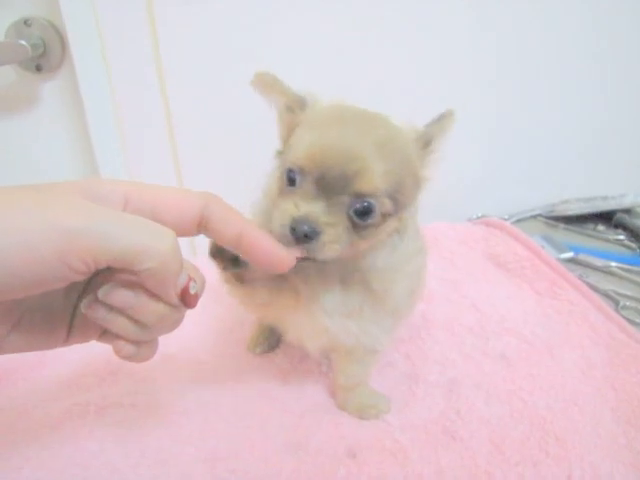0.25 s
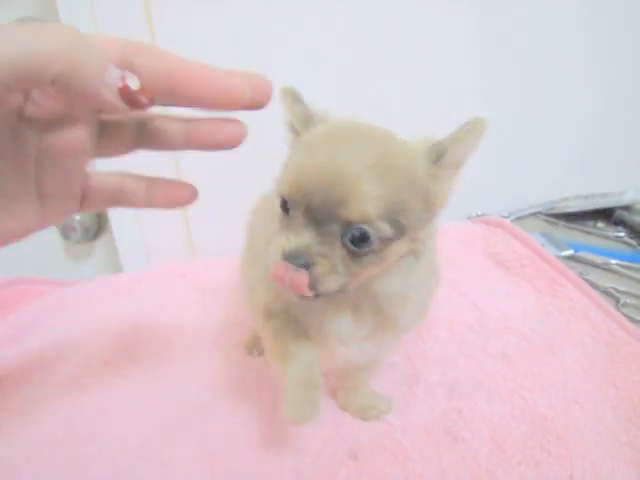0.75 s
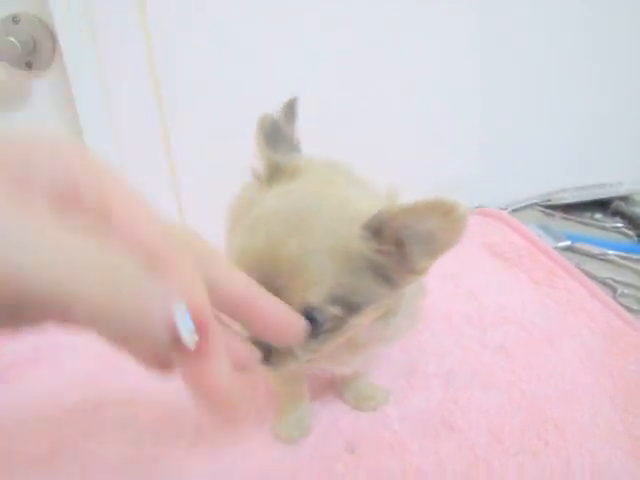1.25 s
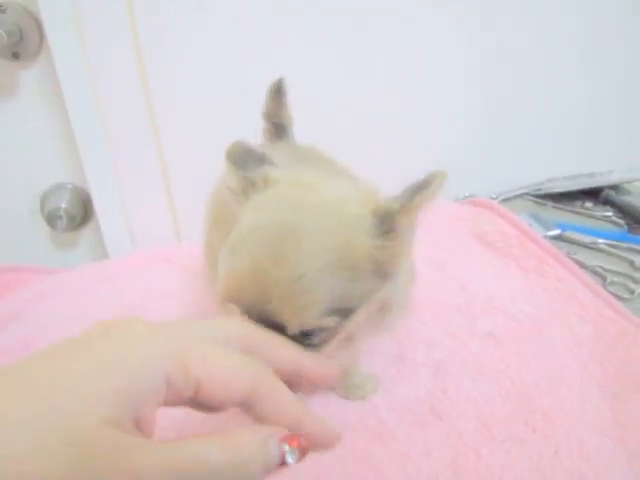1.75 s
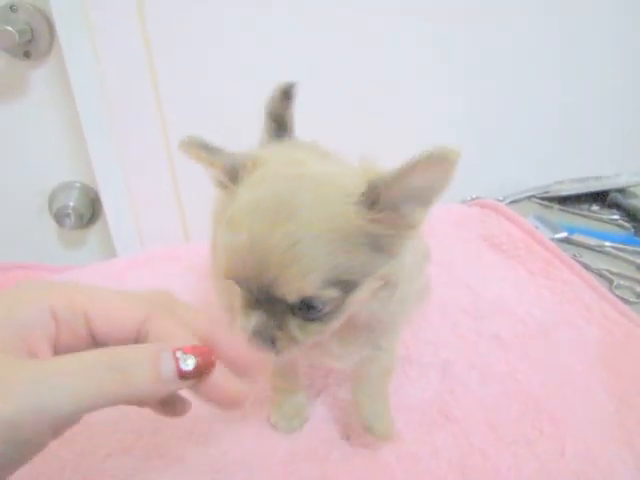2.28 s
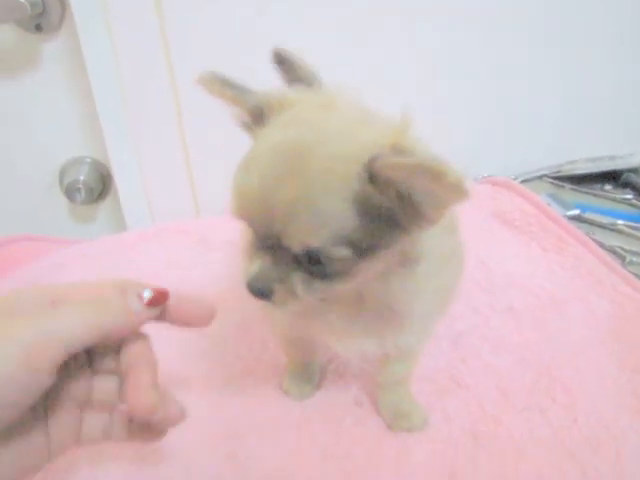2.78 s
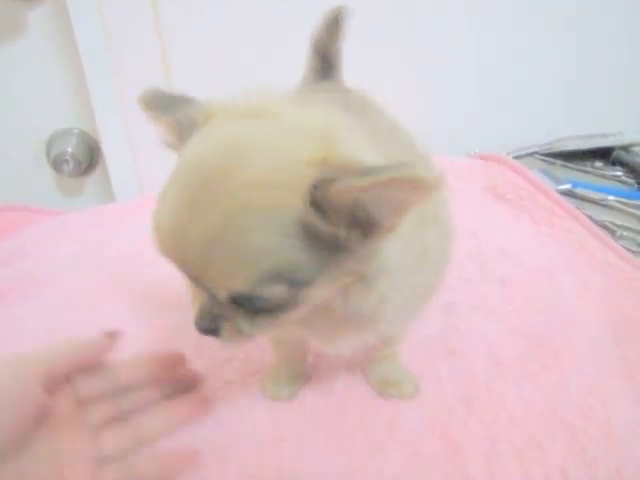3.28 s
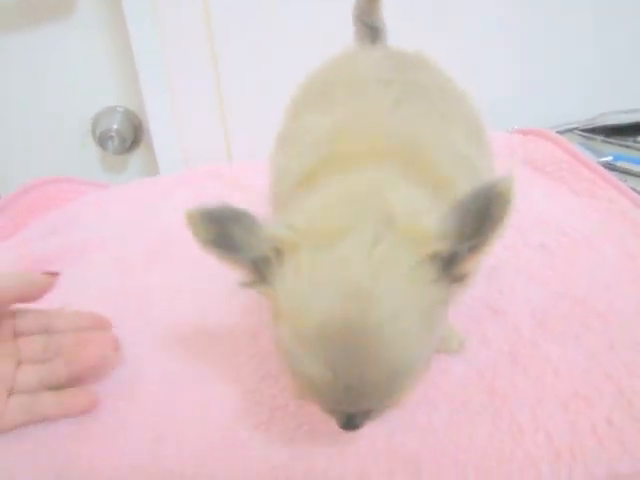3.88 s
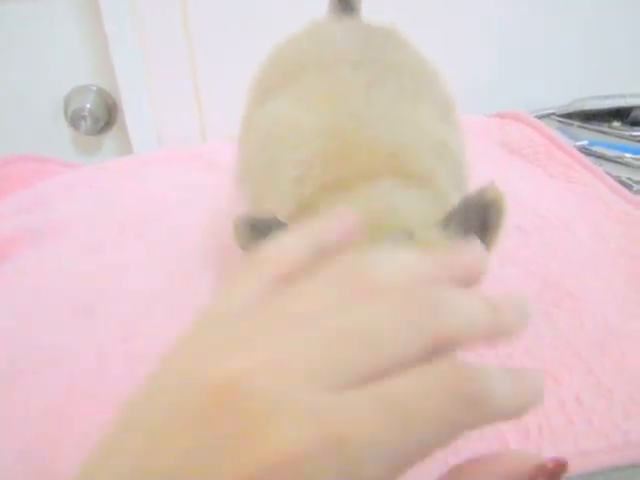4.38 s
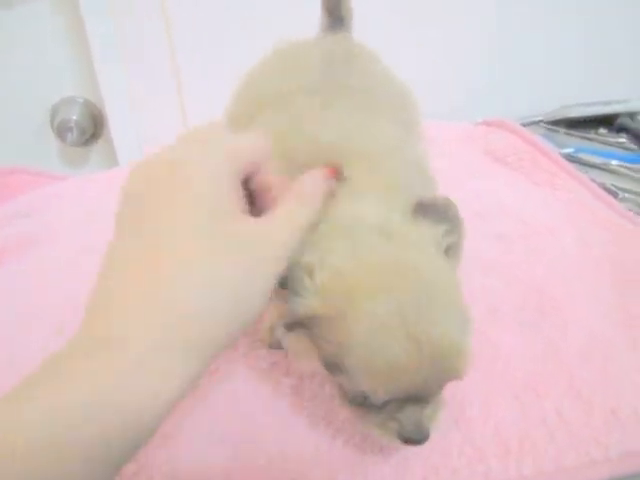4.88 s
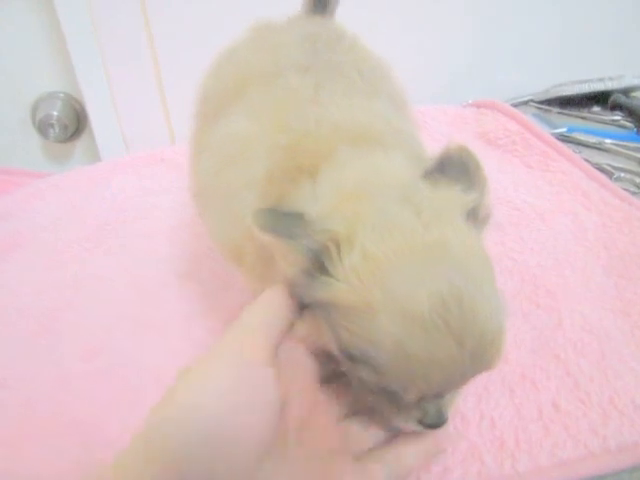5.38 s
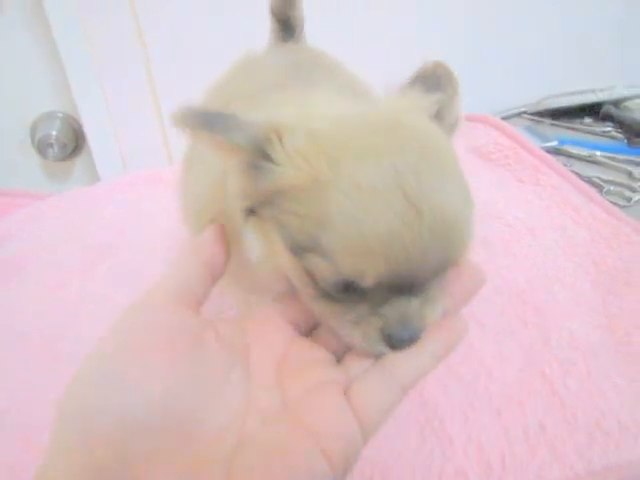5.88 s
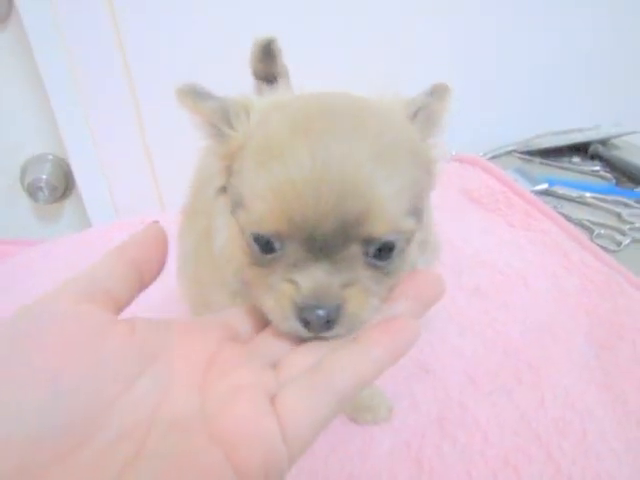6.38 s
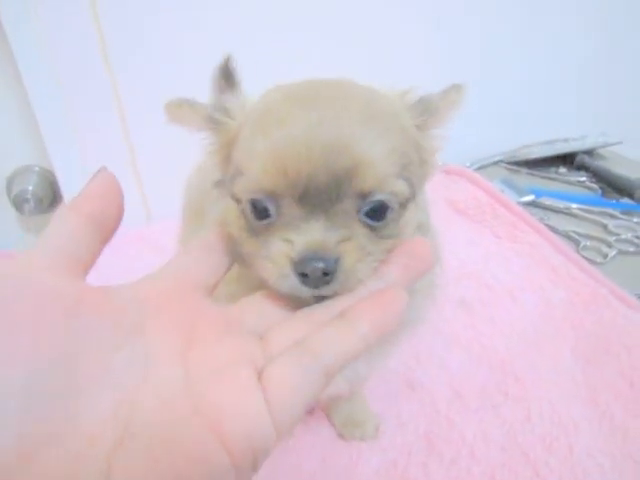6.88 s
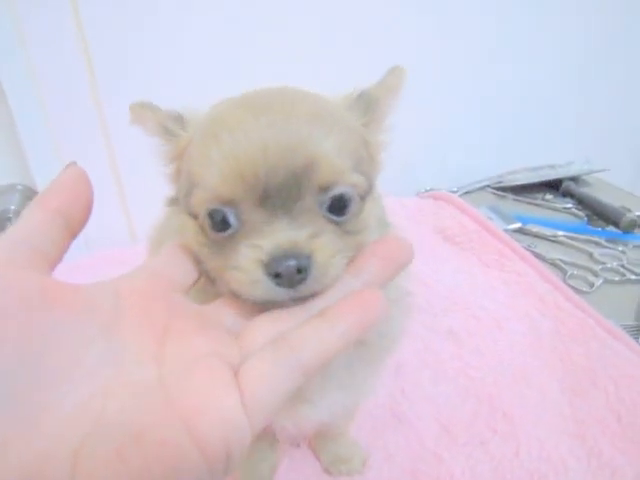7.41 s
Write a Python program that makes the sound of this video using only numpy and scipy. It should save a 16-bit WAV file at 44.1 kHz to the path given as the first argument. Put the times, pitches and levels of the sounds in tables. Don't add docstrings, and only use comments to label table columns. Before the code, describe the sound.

Close stereo pickup of hissy nose puffs, small clicks and fur brushing over soft room air and low fan hum. A nearby puppy gives a soft low moan; distant yaps echo sharply halfway through, the second loudest. A thin plaintive howl follows, holds, slides down and is briefly answered by another puppy, with whimpers and nasal whistling, before only ticks, soft strokes and very faint yaps remain.

```python
import sys
import numpy as np
from scipy import signal
from scipy.fft import rfft, irfft
from scipy.io import wavfile
from scipy.ndimage import uniform_filter1d

SR = 44100
rng = np.random.default_rng(int(sys.argv[2]) if len(sys.argv) > 2 else 0)


def generate_wav(sig):
    pcm = np.round(np.clip(np.atleast_2d(sig).T, -1, 1) * 32767).astype(np.int16)
    wavfile.write(sys.argv[1], SR, pcm)


def volts_from_decibels(level):
    exponent = np.asarray(level, float) / 20
    return 10 ** exponent


N = 337365


def evened(x):
    return x / np.sqrt(np.mean(x ** 2) + 1e-20)


def read(points, hz):
    f, value = np.transpose(points)
    return np.interp(np.log(hz + 1), np.log(f + 1), value)


def add(mix, s, sound):
    part = mix[..., round(s * SR):round(s * SR) + sound.shape[-1]]
    part += sound[..., :part.shape[-1]]


def coloured(points, channels):
    white = rfft(rng.standard_normal((channels, N)))
    return irfft(white * volts_from_decibels(read(points, np.fft.rfftfreq(N, 1 / SR))), N)


def drift(size, hz):
    a, b = rng.standard_normal((2, size + SR))
    r = np.exp(-np.pi * hz / SR)
    once = signal.lfilter([1], [1, -r], a + 1j * b)
    twice = signal.lfilter([1], [1, -r], once)[SR:]
    return twice / np.sqrt(np.mean(abs(twice) ** 2))


def stereo(mid, side):
    return np.array([mid + side, mid - side])


def sniffs():
    # t/s at the middle, hiss level/dB
    quick = [(.426, -63), (.482, -62), (.624, -54.5), (.716, -53), (.829, -55), (.913, -51.5),
             (1.004, -55.5), (1.065, -51), (1.183, -56), (1.244, -54.5), (1.298, -62), (1.442, -62)]
    faint = [(1.911, -63), (2.047, -63), (2.104, -62.5), (2.167, -65), (2.287, -63), (2.45, -63.5),
             (2.57, -66), (2.663, -64), (2.772, -63), (2.894, -57.5), (2.986, -59)]
    deep = [(3.105, -54), (3.199, -57), (3.373, -59.5), (3.475, -53), (3.546, -58), (3.782, -49),
            (3.871, -53.5), (3.975, -55), (4.07, -58.5), (4.982, -57.5)]
    # length/s, low rush against hiss/dB
    bouts = [
        (0.015, -7),
        (.024, 1.5),
        (.03, 1.5),
    ]
    # t/s at the middle, length/s, hiss level/dB, low rush level/dB
    rubs = [
        (1.86, .012, -84, -58),
        (3.3, 0.05, -53.5, -49),
        (4.814, 0.37, -61, -59.5),
        (5.336, 0.064, -90, -49.5),
        (6.11, 0.015, -62, -58),
        (6.516, 0.096, -65.5, -63),
        (7.083, 0.013, -58, -68.5),
        (7.385, 0.034, -82, -63),
    ]
    # f/Hz, level/dB
    hiss = [(3000, -6.5), (6000, 2.5), (11000, -1.5), (15500, -8)]
    # f/Hz, level/dB
    rush = [(700, -23.5), (2000, -3), (3500, -2.5), (6000, -11), (9000, -27.5)]
    rows = list(rubs)
    for bout, (length, rush_db) in zip((quick, faint, deep), bouts):
        rows += [(s, length, db, db + rush_db) for s, db in bout]
    t, out = np.arange(0, N, 16) / SR, np.zeros((2, N))
    for column, colour in ((2, hiss), (3, rush)):
        power = np.zeros(len(t))
        for row in rows:
            s, length = row[:2]
            half = length * np.where(t < s, .85, 1.15)
            power += volts_from_decibels(2 * row[column]) * np.exp(-2.8 * ((t - s) / half) ** 2)
        envelope = np.interp(np.arange(N) / SR, t, np.sqrt(power))
        mid, side = evened(coloured(colour, channels=2))
        out += volts_from_decibels(0.5) * envelope * stereo(mid, volts_from_decibels(-5.0) * side)
    return out


def ticks():
    # t/s, peak level/dB, ring f/Hz, left against
    # right/dB
    middle = [(0.4321, -31.5, 2790, -4), (0.4993, -35.5, 2720, -6), (1.094, -33.5, 2900, -5),
              (1.201, -31, 3870, -5), (1.212, -32, 4170, -2.5), (1.591, -38, 4340, -1.5),
              (1.853, -35, 4500, -1.5), (2.304, -44, 3600, -2.5), (2.827, -45, 2660, -1.5),
              (3.1125, -32, 3540, -3), (5.4562, -42, 3470, -6), (6.5862, -43, 4140, 10),
              (7.059, -36.5, 4360, -0.5), (7.085, -33.5, 4230, -0.5), (7.159, -48, 2600, -3)]
    bright = [(0.4823, -40, 7220, -2.5), (0.525, -41.5, 6600, -0.5), (1.2989, -47, 5900, -0.5),
              (1.4401, -41, 7740, -1.0), (2.1275, -37, 5600, 0.0), (2.17, -36, 7800, 3),
              (2.1705, -39, 4050, -2), (3.0736, -40, 5530, 0.0), (6.095, -31, 7420, 8),
              (6.941, -30.5, 12100, -7), (6.941, -26.5, 7800, -4), (6.962, -42, 11000, 0)]
    dull = [
        (0.2614, -36, 1060, -2.0),
        (1.5915, -34, 1950, -5),
        (1.7984, -32, 2380, -4),
        (2.1284, -37, 1400, -4),
        (2.659, -40, 1940, -2.0),
        (6.4895, -36, 955, 1),
        (6.5044, -34, 1540, -10),
        (6.5298, -34.5, 1565, -2.0),
    ]
    ring_cycles = [
        2.56,
        2.2,
        1.56,
    ]
    out, t = np.zeros((2, N)), np.arange(900) / SR
    for kind, cycles in zip((middle, bright, dull), ring_cycles):
        for s, db, hz, pan_db in kind:
            u = 3 * t * hz / max(cycles, .3)
            swell = np.e * u * np.exp(-u)
            scuff = uniform_filter1d(rng.standard_normal(900), 12) * np.exp(-t / 0.0057)
            gain = volts_from_decibels(db - 3.0 + np.array([[.5], [-.5]]) * pan_db)
            add(out, s, gain * (swell + 0.82 * scuff) * np.sin(2 * np.pi * hz * t))
    return out


def puppies():
    # t/s, pitch f/Hz, effort level/dB, mouth opening as second partial over first/dB
    moan = [
        (.33, 150.3, -53, 2.5),
        (.44, 170.6, -49, -5.5),
        (.58, 193, -44.5, -7),
        (.66, 199.1, -34.5, -13.5),
        (.76, 202.6, -43, -1),
        (.87, 191.4, -37.5, -11),
        (1.0, 182.6, -51, -1),
        (1.2, 165.6, -54, -17),
        (1.3, 169, -59, -8),
    ]
    howl = [
        (4.4, 312.4, -42, -8),
        (4.49, 327.7, -35, -4),
        (4.535, 370.4, -30, -5),
        (4.58, 435.5, -38, 3.5),
        (4.77, 447.8, -26, -0.5),
        (4.9, 460.5, -31.5, -1),
        (5.2, 448.7, -30, -2),
        (5.32, 432, -39, 3),
    ]
    sag = [
        (5.3, 441.7, -40.5, 4),
        (5.42, 423.5, -32.5, -2),
        (5.5, 393.4, -34, -0.5),
        (5.66, 370.8, -36, -5.5),
        (5.78, 373, -50, 5),
        (5.9, 376.3, -37.5, -2),
        (6.16, 359.6, -34.5, -2),
        (6.24, 310.5, -32.5, -8),
        (6.3, 295.7, -52, 6),
    ]
    growl = [
        (3.38, 171.4, -55, -8),
        (3.52, 178.6, -46.5, -11),
        (3.6, 282.2, -40.5, -4.5),
        (3.66, 317.6, -38.5, 0),
    ]
    answer = [
        (5.67, 401.4, -30, -3.5),
        (5.725, 496.5, -37, 1.5),
        (5.79, 505.7, -45.5, 17.5),
        (5.87, 475, -39, 6),
        (5.99, 425.3, -51.5, 6),
    ]
    yaps = [
        [(3.59, 525.7, -61, -6.5), (3.62, 698.4, -45.5, 12), (3.64, 747, -41, 16.5), (3.68, 783.7, -35, 15.5),
         (3.72, 833, -36.5, 12), (3.78, 781, -51, 4)],
        [(4.19, 488.3, -54, 14.5), (4.213, 529, -52, 29), (4.232, 571.5, -40.5, 23.5),
         (4.244, 738.7, -22, 14.5), (4.272, 827, -26.5, 18), (4.325, 808.3, -30.5, 0), (4.365, 828.4, -23, 7),
         (4.4, 775, -56, 19)],
        [(7.3, 370, -91, 14), (7.35, 390, -79.5, 24.8), (7.5, 370.6, -74.5, 6)],
        [(7.56, 559, -82, 21.8), (7.622, 567.6, -68, 27.8), (7.66, 564, -55.5, 40.9)],
        [(3.582, 808, -53.5, -17.5), (3.6, 940.4, -34.5, -4.5), (3.7, 879, -31, -17), (3.75, 890, -50, -17)],
    ]
    # f/Hz, level/dB
    wide = [
        [(1800, 8.5), (2400, -23), (2900, -2.5), (3350, -2.5), (3550, -29.5), (4900, -21.5), (5200, -37),
         (8000, -39.5), (11500, -41.5), (15000, -52)],
        [(1000, -1), (2400, -23.5), (3100, -13), (3600, -30), (4100, -14), (4950, -20.5), (5150, -28.5),
         (8500, -56.5), (11500, -46), (15000, -59.5)],
        [(1150, 4), (2000, -14.5), (2800, 0), (3600, -25.5), (5000, -17), (7000, -32)],
        [(1700, -41), (2900, -27), (3500, -76), (9000, -65)],
        [(2800, -15), (5000, -21.5), (6000, -50)],
    ]
    # f/Hz, level/dB
    half_open = [(1500, -10.5), (2000, -23.5), (2600, -44), (4500, -57), (6000, -72)]
    # f/Hz, level/dB
    shut = [(500, -16.5), (950, -24), (1350, -26.5), (1900, -28.5), (2400, -54.5), (5000, -65)]
    yap_rough = [.1, .09, .08, .012, .5]
    # t/s, length/s, level/dB, first pitch f/Hz, last pitch f/Hz
    whimpers = [
        (2.7, .12, -53, 227, 206),
        (4.31, .1, -43, 500, 300),
        (5.985, .08, -43, 212, 198),
        (6.18, .25, -37, 330, 180),
    ]
    whines = [
        (4.97, .09, -57, 325, 330),
        (6.08, .29, -52, 545, 430),
    ]
    far, near = np.zeros((2, N))
    for rows, mouth, rough in zip(yaps, wide, yap_rough):
        add(far, *call(rows, mouth, odd_db=0, flutter_hz=125.0, rough=rough))
    voices = [(moan, .08), (howl, .035), (sag, .08), (growl, .85)]
    voices += [(arch(*row, open_db=-7), .4) for row in whimpers]
    voices += [(arch(*row, open_db=16), .55) for row in whines]
    for rows, rough in voices:
        add(near, *call(rows, shut, odd_db=2.0, flutter_hz=58.8, rough=rough))
    add(near, *call(answer, half_open, odd_db=-4.5, flutter_hz=70., rough=.09))
    add(near, *whistle())
    direct = (volts_from_decibels(1.0) * far + near) * volts_from_decibels(np.array([[-.4], [.4]]))
    return direct + room(volts_from_decibels(-0.5) * far, liveness=0.73) + room(volts_from_decibels(-9) * near, liveness=.55)


def call(rows, mouth, odd_db, flutter_hz, rough):
    # t/s, depth/dB
    level_dips = [
        (.91, -35),
        (4.727, -21),
        (4.854, -12),
        (5.315, -12),
        (5.486, -9),
        (5.572, -10),
        (5.986, -21),
        (6.178, -14),
        (6.225, -4),
    ]
    dip_s, rough_per_db = 0.012, .07
    s, *columns = np.transpose(rows)
    t = np.arange(s[0], s[-1], 1 / SR)
    hz, first_db, open_db = (np.interp(t, s, c) for c in columns)
    first_db = first_db + sum(db * np.exp(-((t - at) / dip_s) ** 2) for at, db in level_dips)
    second_db = first_db + open_db
    effort_db = np.maximum(first_db, second_db)
    rough = np.minimum(rough * (1.5 + rough_per_db * (effort_db.max() - effort_db)), 1)
    turns = np.cumsum(hz * (1 + 0.0498 * rough * drift(len(t), 38.5).real)) / SR
    partials = []
    for k in range(1, int(15000 / hz.max())):
        db = first_db if k == 1 else second_db + (k > 2) * odd_db * (k % 2)
        blur = np.clip(rough * k ** 1.3, 0, 1)
        flutter = np.sqrt(1 - blur ** 2) + blur * drift(len(t), flutter_hz * min(k, 6))
        flutter = flutter * (1 + .25 * drift(len(t), 16.))
        partials.append(np.sqrt(2) * volts_from_decibels(db) * (flutter * np.exp(2j * np.pi * k * turns)).real)
    fade = signal.windows.tukey(len(t), .1)
    upper = rfft(sum(partials[2:]) * fade)
    upper = irfft(upper * volts_from_decibels(read(mouth, np.fft.rfftfreq(len(t), 1 / SR))), len(t))
    return s[0], (partials[0] + partials[1] + upper) * fade


def arch(start, length, db, first_hz, last_hz, open_db):
    return [(start + u * length, first_hz + u * (last_hz - first_hz), db + drop_db, open_db)
            for u, drop_db in ((0, -15), (0.37, 0), (1, -12.5))]


def whistle():
    # t/s, level/dB, centre f/Hz
    path = [
        (5.38, -72, 4200),
        (5.62, -62.5, 4350),
        (5.77, -72, 4340),
        (5.899, -64, 4460),
        (6.12, -66, 4567),
        (6.299, -87, 4610),
    ]
    s, db, hz = np.transpose(path)
    t = np.arange(s[0], s[-1], 1 / SR)
    turns = np.cumsum(np.interp(t, s, hz)) / SR
    band = (drift(len(t), 550.0) * np.exp(2j * np.pi * turns)).real
    return s[0], np.sqrt(2) * volts_from_decibels(np.interp(t, s, db)) * band * signal.windows.tukey(len(t), .2)


def room(x, liveness):
    # f/Hz, t60/s
    decay = [(200, 1), (1000, 1), (1600, 1), (3500, 0.87), (8000, 0.29)]
    # f/Hz, side against mid/dB
    tail_width = [(200, -18), (800, -11), (1600, -8.5), (3000, -1), (6000, 3)]
    hz, t, z = signal.stft(rng.standard_normal((2, int(1.3 * SR))), SR, nperseg=256)
    build_up = np.minimum(t / 0.0077, 1)
    z = z * volts_from_decibels(-60 * t / (liveness * read(decay, hz)[:, None])) * build_up
    z[1] *= volts_from_decibels(read(tail_width, hz))[:, None]
    tail = signal.istft(z, SR, nperseg=256)[1]
    tail = tail / np.linalg.norm(tail[0])
    return stereo(*signal.fftconvolve(x[None], tail, axes=1)[:, :N])


def air():
    # f/Hz, level/dB
    air_colour = [(8.8, -34.5), (15, 2.5), (97, -5.5), (164, -13), (213, -9), (340, -11.5), (394, -17.5),
                  (497, -21), (628, -18), (840, -20.5), (1300, -21.5), (1690, -26), (6670, -35.5),
                  (11000, -40), (16000, -49.5)]
    # f/Hz, side against mid/dB
    air_width = [(60, -7), (110, -5), (200, -9), (380, -7), (700, -5.5), (1290, -1), (2380, -1.5),
                 (4400, 0.5), (8120, 0.5), (15000, 2)]
    # f/Hz, width/Hz, level/dB
    hum = [(26, 10, -52), (60.7, 10, -58.5), (86.6, 7.5, -54), (121.7, 7.7, -61.5), (395, 8.3, -64),
           (1270, 70, -69.5), (1580, 2, -79), (10750, 30, -87.5)]
    t, hz = np.arange(N) / SR, np.fft.rfftfreq(N, 1 / SR)
    mid, side = coloured(air_colour, channels=2)
    side = irfft(rfft(side) * volts_from_decibels(read(air_width, hz)), N)
    out = volts_from_decibels(-49) * stereo(mid, side) / mid.std()
    for line_hz, width, db in hum:
        waver = 0.51 + drift(N, width)
        out += np.sqrt(2) * volts_from_decibels(db) * (waver * np.exp(2j * np.pi * line_hz * t)).real
    return out


def scene():
    return sniffs() + ticks() + puppies() + air()


def top_cut(x):
    return signal.sosfilt(signal.butter(12, 16450, fs=SR, output="sos"), x)


def record(dry):
    power_db = 10 * np.log10(abs(uniform_filter1d((dry ** 2).mean(0), 800)) + 1e-12)
    fall = np.arange(N) * 16. / SR
    held_db = np.maximum.accumulate(power_db + fall) - fall
    over_db = np.maximum(held_db + 20, 0)
    start_db = 4 * np.exp(-np.arange(N) / SR / 0.024)
    ducked = dry / volts_from_decibels(.5 * uniform_filter1d(over_db, 300) + start_db)
    padded = np.pad(ducked, ((0, 0), (200, 200)), "reflect", reflect_type="odd")
    low_pass = signal.firwin(401, 15800, window=("kaiser", 6), fs=SR)
    limited = signal.oaconvolve(padded, low_pass[None], "valid", axes=1)
    return top_cut(limited)


dry = scene()
out = record(dry)
generate_wav(out)
```